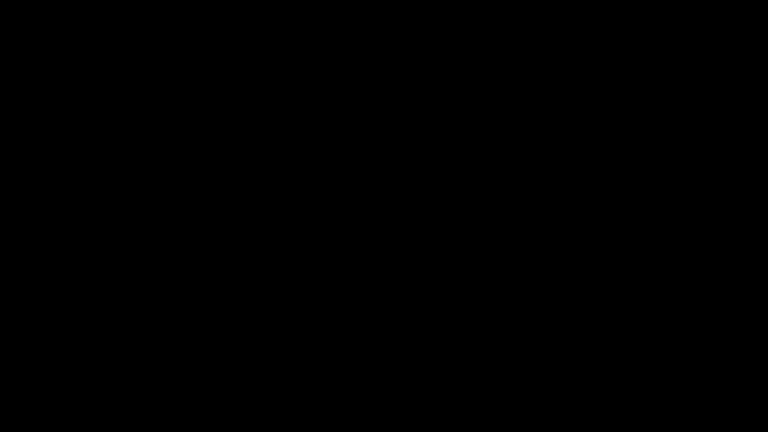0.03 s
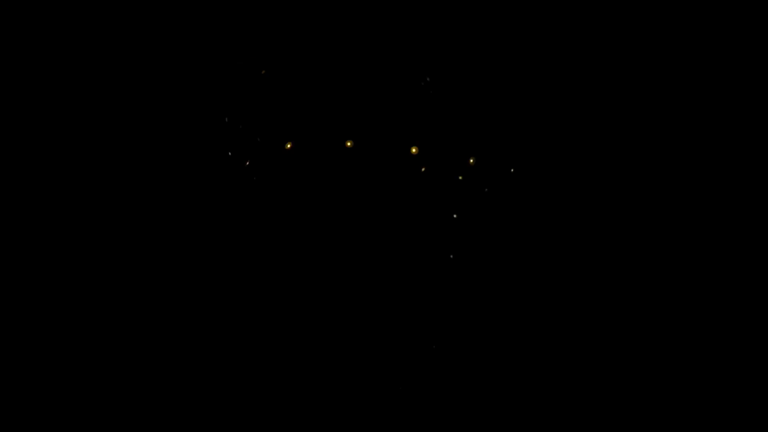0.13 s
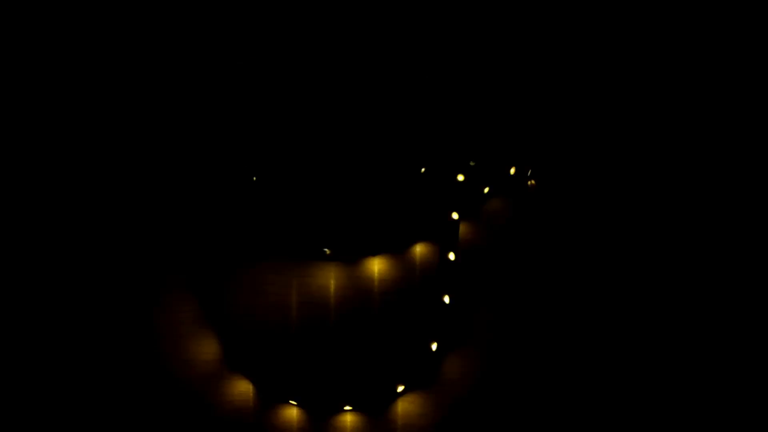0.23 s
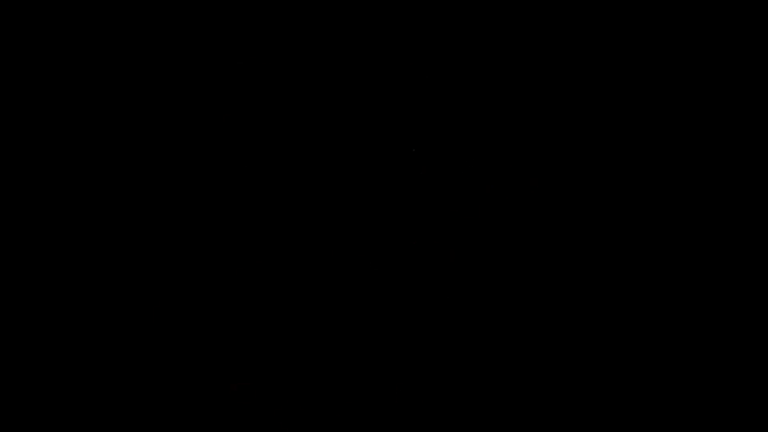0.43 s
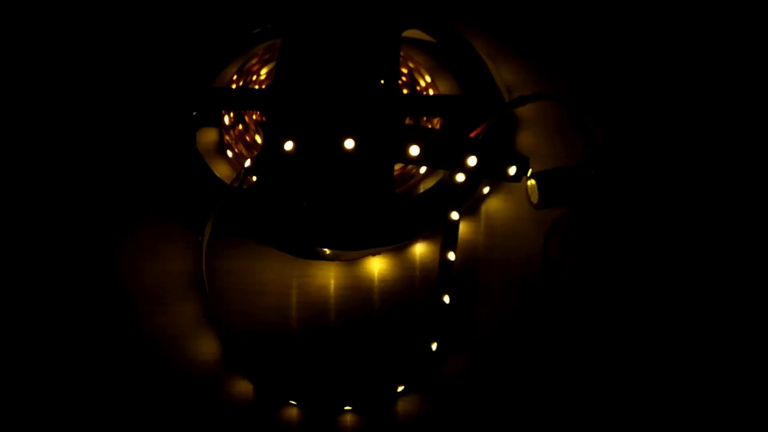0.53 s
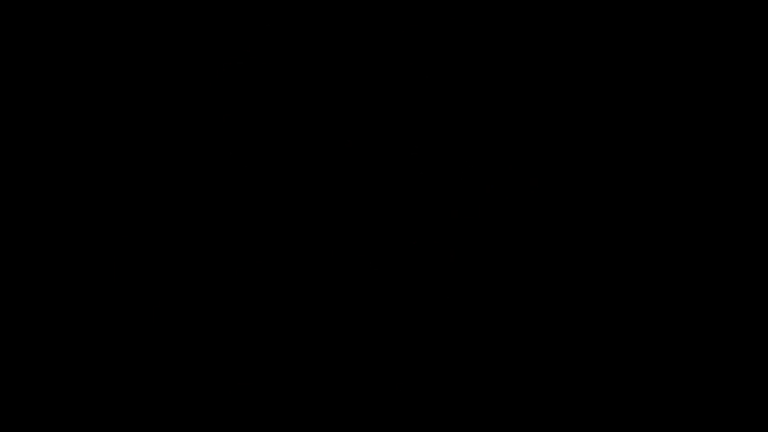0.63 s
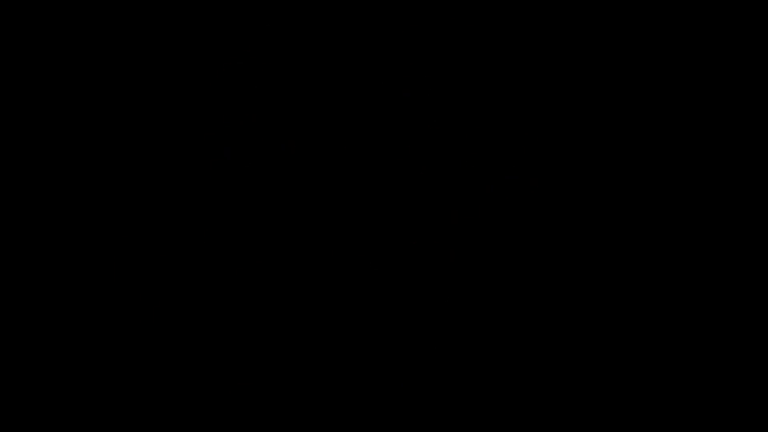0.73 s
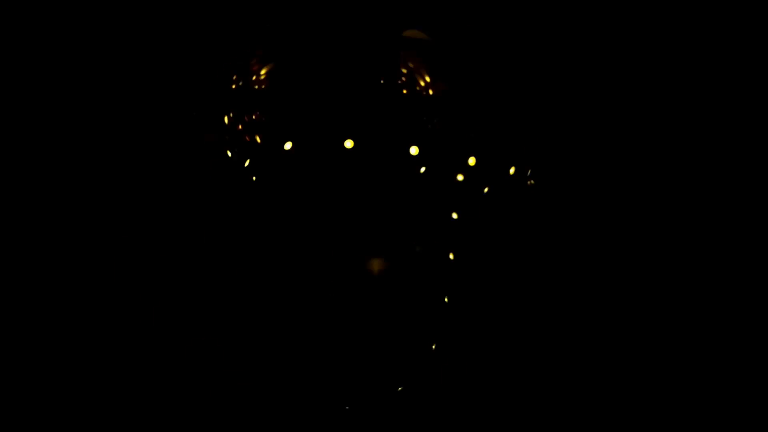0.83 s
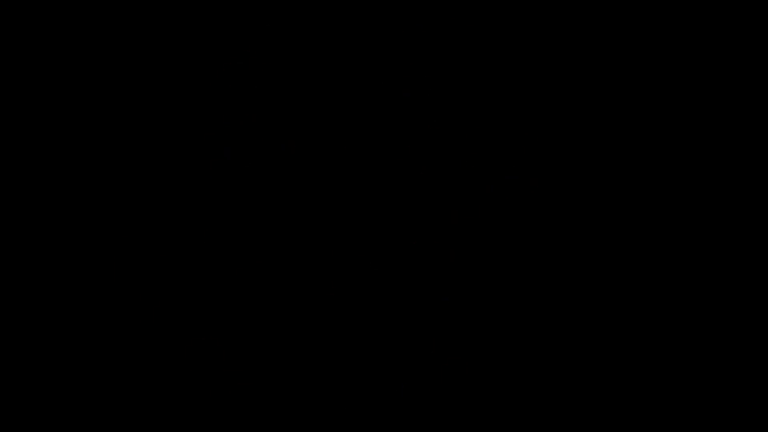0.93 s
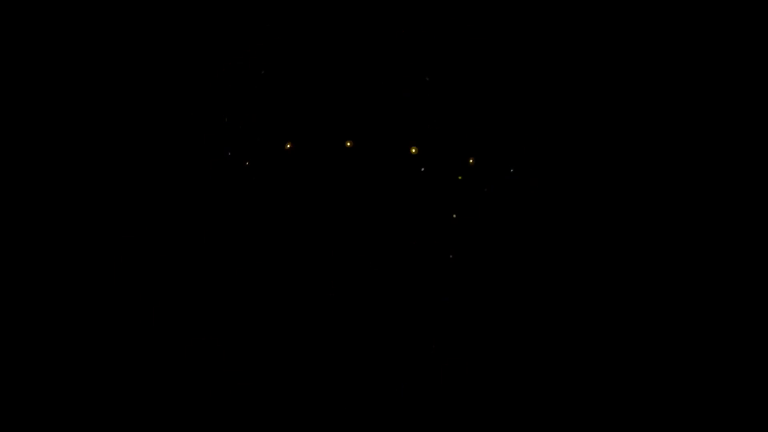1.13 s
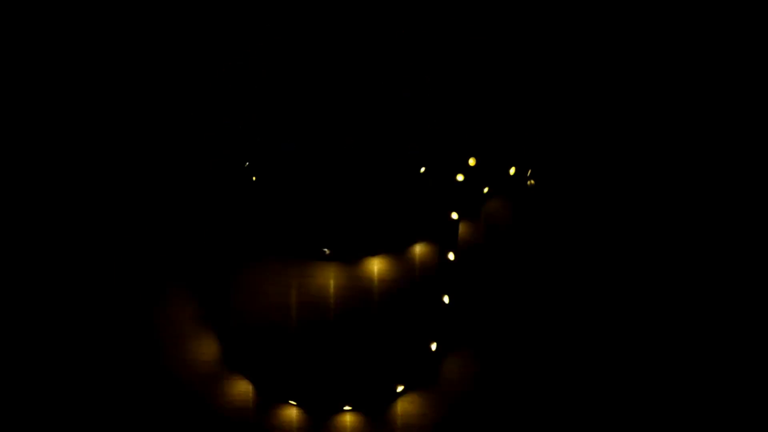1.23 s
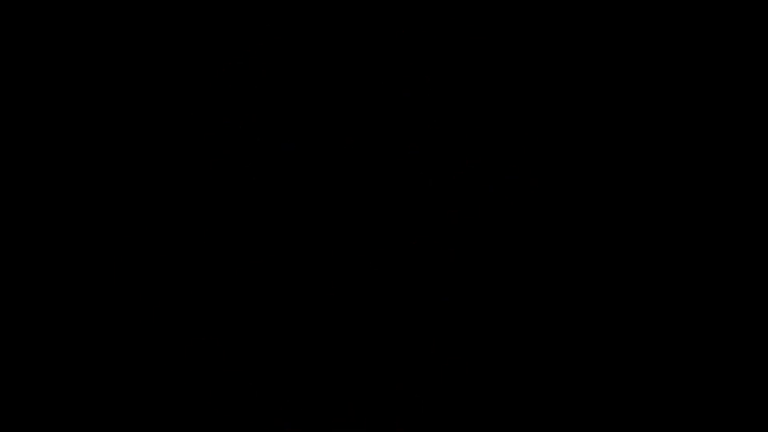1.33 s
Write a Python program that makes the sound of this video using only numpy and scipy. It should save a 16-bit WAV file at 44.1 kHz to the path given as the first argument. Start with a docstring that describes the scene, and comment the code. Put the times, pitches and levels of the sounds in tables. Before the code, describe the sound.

A small relay switches in crisp, bright clicks with a tiny case rattle, about every 0.14 seconds from 0.15 to 1.3, slightly left in close, wide stereo. After brief opening silence, soft room rumble, low hum and hiss fade in. At 0.31 a hard hollow object brushes, cracks and thuds nearby, ringing shortly. A faint tick follows at 0.51, a faint hollow tap at 0.86.

```python
"""A quiet room: a small relay switches seven times a second, a little to the left of the stereo microphone.
Each snap of the armature rings the contacts, rattles the case and nudges its mount; the room answers.
Once, nearby, a hard hollow object brushes, cracks and thuds down, and its body rings in beating modes.
A faint tick and a hollow tap follow. Snaps and rings are impulses and damped sines; rattle, cracks and
room tails are fading coloured noise. Behind lie a wavering low hum, room rumble and hiss."""
import sys
import numpy as np
from scipy import signal
from scipy.fft import rfft, irfft, next_fast_len
from scipy.io import wavfile

SR = 44100
rng = np.random.default_rng(int(sys.argv[2]) if len(sys.argv) > 2 else 0)


def generate_wav(sig):
    """Save sig (samples, or channels by samples) to the path in sys.argv[1] as 16-bit PCM at SR."""
    pcm = np.round(np.clip(np.atleast_2d(sig).T, -1, 1) * 32767).astype(np.int16)
    wavfile.write(sys.argv[1], SR, pcm)


N = 61739
T = np.arange(N) / SR
START_S = 0.078  # the sound opens here
NEAR_CENTRE_LAG_S = .00008  # right side after left, for the knock and the tap


def from_db(db):
    """Decibels to amplitude gain."""
    return 10 ** (np.asarray(db) / 20)


def at_hz(points, size):
    """Read a spectrum table on the grid of a transform, along log frequency."""
    hz, value = np.transpose(points)
    grid_hz = np.arange(size // 2 + 1) * SR / size
    return np.interp(np.log(grid_hz + 1), np.log(hz), value)


def colour(x, points):
    """Minimum-phase filter with the given spectrum, scaled to keep the power of white noise."""
    size = 2 * next_fast_len(N)
    gain = from_db(at_hz(points, size))
    cepstrum = irfft(np.log(gain / np.sqrt(np.mean(gain ** 2))))
    # folding the cepstrum makes the filter causal
    cepstrum[1:size // 2] *= 2
    cepstrum[size // 2 + 1:] = 0
    response = np.exp(rfft(cepstrum))
    return irfft(rfft(x, size) * response)[..., :N]


# likeness of left and right in diffuse sound: (f/Hz, correlation 0-1)
DIFFUSE_LIKENESS = [(30, 0), (100, 0), (350, 0.2), (700, 0.81), (1300, 0.21), (2000, 0.05)]


def diffuse():
    """White stereo noise arriving from all round: the two sides are most alike near 700 Hz."""
    size = 2 * next_fast_len(N // 2 + 1)
    alike = np.clip(at_hz(DIFFUSE_LIKENESS, size), -1, 1)
    mid, side = rfft(rng.standard_normal((2, size)))
    mid = np.sqrt((1 + alike) / 2) * mid
    side = np.sqrt((1 - alike) / 2) * side
    return irfft(mid + side * [[1], [-1]])[:, :N]


def blows(times, dbs):
    """One impulse for each blow."""
    out = np.zeros(N)
    samples = np.clip((np.asarray(times) * SR).astype(int), 0, N - 1)
    np.add.at(out, samples, from_db(dbs))
    return out


def dying(hits, t60, hold=0):
    """Envelope that holds, then dies away after every impulse; overlapping powers add."""
    power = from_db(-60 * np.maximum(T - hold, 0) / t60) ** 2
    total = signal.fftconvolve(hits ** 2, power)[:N]
    return np.sqrt(np.maximum(total, 0))


def ring(hits, modes, sign=1, rise=1e-6):
    """Impulses excite damped sines; mode k is scaled by sign**k, and a soft blow takes time to rise."""
    body = np.zeros(N)
    for k, (hz, db, t60) in enumerate(modes):
        decay = from_db(db - 60 * T / t60)
        body += sign ** k * decay * np.sin(2 * np.pi * hz * T)
    return signal.fftconvolve(hits, body * (1 - np.exp(-T / rise)))[:N]


def later(x, s):
    """Delay by whole samples."""
    return np.interp(np.arange(N) - np.round(s * SR), np.arange(N), x, left=0)


def place(x, lag, pan_db=0):
    """A source left of the microphone: left comes first, raised by pan_db; right is lowered by it."""
    return np.array([x * from_db(pan_db), later(x, lag) * from_db(-pan_db)])


# armature snaps: (t/s, relative snap level/dB, relative nudge level of the mount/dB)
ARMATURE_SNAPS = [(0.013, -11, -1.5), (0.1537, -2.5, -0.5), (0.2958, -4.5, -2), (.4382, -4, 1.5),
                  (0.5801, -3.5, 0), (0.725, -3.5, -1.5), (0.8673, -2, -0.5), (1.0089, -3, -0.5),
                  (1.1510, -3, 1), (1.2955, -4, 0.5)]
# ring of the contacts: (f/Hz, relative level/dB, t60/s)
CONTACT_RING = [(6230, -45.5, 0.054), (8430, -38.5, 0.0045), (10160, -34, 0.011), (13000, -37.5, 0.0087)]
# colour of the snap: (f/Hz, relative level/dB)
SNAP_COLOUR = [(1500, -15), (3500, -21), (5000, 0), (6300, -14), (8300, 9), (10100, 0.5), (11000, -6),
               (14500, -7.5)]
# colour of the rattling case: (f/Hz, relative level/dB)
CASE_COLOUR = [(1200, -11), (2300, 6), (3800, -11.5), (5500, 1.5), (7500, 10.5), (11000, 1.5), (14000, -11)]
# ring of the mount: (f/Hz, relative level/dB, t60/s)
MOUNT_RING = [(457, -40.5, 0.027), (720, -49, 0.036), (897, -51.5, 0.03), (1187, -52, 0.036),
              (1850, -70, 0.054)]
# colour of the room's answer to a click: (f/Hz, relative level/dB)
CLICK_ROOM_COLOUR = [(400, 6), (900, 9.5), (1400, -2.5), (4800, -8.5), (6300, 0), (7200, 2.5), (8400, 7),
                     (9100, -2), (10000, 5.5), (10800, -1), (13300, 2), (15000, -19)]
SNAP_DB, BOUNCE_S, BOUNCE_DB = -18, .0005, -2  # the bounce time varies by up to 30 %
RATTLE_DB, RATTLE_HOLD_S, RATTLE_T60_S = -42.5, .007, .012
MOUNT_DELAY_S, REBOUND_S, REBOUND_DB = 0.00094, 0.004318, -1.5
CLICK_TAIL_DB, CLICK_TAIL_T60_S, CLICK_TAIL_DELAY_S = -45, 0.35, .009
RELAY_LAG_S, RELAY_PAN_DB = .00032, 3.2
MOUNT_LAG_S, MOUNT_PAN_DB = .00008, 2


def relay():
    """A snap bounces once and rings the contacts, rattles the case, nudges the mount twice, then the room."""
    s, snap_db, nudge_db = np.transpose(ARMATURE_SNAPS)
    hits = blows(s, snap_db)
    bounces = blows(s + BOUNCE_S * rng.uniform(.7, 1.3, len(s)), snap_db + BOUNCE_DB)
    snap = from_db(SNAP_DB) * colour(hits + bounces, SNAP_COLOUR)
    contacts = ring(hits, CONTACT_RING)

    rattle_noise = dying(hits, RATTLE_T60_S, RATTLE_HOLD_S) * diffuse()
    rattle = from_db(RATTLE_DB) * colour(rattle_noise, CASE_COLOUR)

    nudges = blows(s + MOUNT_DELAY_S, nudge_db)
    rebounds = from_db(REBOUND_DB) * later(nudges, REBOUND_S)
    mount = ring(nudges + rebounds, MOUNT_RING)

    tail_noise = dying(later(hits, CLICK_TAIL_DELAY_S), CLICK_TAIL_T60_S) * diffuse()
    room = from_db(CLICK_TAIL_DB) * colour(tail_noise, CLICK_ROOM_COLOUR)

    direct = place(snap + contacts, RELAY_LAG_S, RELAY_PAN_DB)
    return direct + rattle + place(mount, MOUNT_LAG_S, MOUNT_PAN_DB) + room


# the hollow object lands and chatters: (t/s, relative level/dB)
LANDINGS = [(.3112, -5), (.3133, 1), (.3153, 0), (.3173, -2), (.3202, -5)]
# colour of the brush against the surface: (f/Hz, relative level/dB)
BRUSH_COLOUR = [(100, -19), (500, 5), (1200, -13), (2200, 18), (6200, -1), (14000, -26)]
# colour of the cracks: (f/Hz, relative level/dB)
CRACK_COLOUR = [(50, -30), (130, -15), (210, -4), (320, -2), (590, 6), (750, -3), (1100, 1), (1500, -2),
                (2400, -3), (3500, -6), (4700, -10), (6100, -11), (7400, -22), (9000, -20), (14000, -23)]
# thud of the surface: (f/Hz, level/dB before each mode gains 1.32 times more than the last, t60/s)
SURFACE_THUD = [(194, -39.5, .08), (344, -38.5, 0.05), (590, -27.5, 0.04), (1080, -27, 0.024),
                (1436, -34, 0.011), (2187, -37, 0.028)]
# ring of the hollow body: (f/Hz, relative level/dB, t60/s)
HOLLOW_RING = [(190, -48, .25), (350, -46, .25), (533, -41, .3), (591, -34.5, .25), (842, -37, .25),
               (925, -27, .22), (965, -39, .4), (1008, -39, .4), (1052, -36.5, .38), (1082, -33.5, .54),
               (1130, -42, .36), (1201, -43.5, .36), (1357, -46, .25), (1411, -47, .33), (1642, -48, .22),
               (2156, -48, .15)]
# colour of the room's answer to the knock: (f/Hz, relative level/dB)
KNOCK_ROOM_COLOUR = [(50, -10), (120, -5.5), (200, -1), (600, 0), (720, -6), (1000, 6.5), (1500, -6),
                     (2400, -5), (3400, -9), (4700, -8.5), (6100, -16.5), (7400, -16.5), (9000, -19.5),
                     (14000, -22)]
BRUSH_S, BRUSH_DB = 0.0083, -41.5  # it brushes the surface for this long just before landing
CRACK_DB, CRACK_T60_S = -23.5, .014
SETTLE_S, KNOCK_RISE_S, KNOCK_RING_DB = .3236, .0006, -1.8  # it drops flat and its hollow body rings
KNOCK_TAIL_DB, KNOCK_TAIL_T60_S, KNOCK_TAIL_DELAY_S = -34, 0.61, 0.0043


def knock():
    """A brush, a quick chatter of cracks and a thud; then the hollow body rings, its close modes beating."""
    s, crack_db = np.transpose(LANDINGS)
    brush_noise = dying(blows(s[:1] - BRUSH_S, 0), CRACK_T60_S, BRUSH_S) * diffuse()
    brush = from_db(BRUSH_DB) * colour(brush_noise, BRUSH_COLOUR)

    crack_noise = dying(blows(s, crack_db), CRACK_T60_S) * diffuse()
    crack = from_db(CRACK_DB) * colour(crack_noise, CRACK_COLOUR)

    # the second landing thuds; its modes alternate in sign
    thud = ring(blows(s[1:2], 0), SURFACE_THUD, sign=-1.32)
    body = ring(blows([SETTLE_S], KNOCK_RING_DB), HOLLOW_RING, rise=KNOCK_RISE_S)

    landing = blows(s[:1], 0)
    tail_noise = dying(later(landing, KNOCK_TAIL_DELAY_S), KNOCK_TAIL_T60_S) * diffuse()
    room = from_db(KNOCK_TAIL_DB) * colour(tail_noise, KNOCK_ROOM_COLOUR)
    return place(thud + body, NEAR_CENTRE_LAG_S) + crack + brush + room


# ring of the faint hollow tap: (f/Hz, relative level/dB, t60/s)
TAP_RING = [(683, -47, 0.18)]
TAP_S = .86  # just before one of the clicks


def tap():
    """One faint, hollow tap: an impulse rings a single damped mode."""
    return place(ring(blows([TAP_S], 0), TAP_RING), NEAR_CENTRE_LAG_S)


# colour of the faint tick: (f/Hz, relative level/dB)
TICK_COLOUR = [(1000, -31), (3500, -4), (5700, 3), (8000, -6), (14000, -11)]
TICK_S, TICK_DB, TICK_T60_S = .513, -51, 0.13


def tick():
    """One faint tick after the knock: bright diffuse noise that dies away."""
    noise = dying(blows([TICK_S], 0), TICK_T60_S) * diffuse()
    return from_db(TICK_DB) * colour(noise, TICK_COLOUR)


# colour of the steady room noise: (f/Hz, relative level/dB)
ROOM_NOISE = [(25, -22), (40, -13), (65, -1.5), (85, -3.5), (120, 2.5), (170, 0.5), (260, -7), (420, -3.5),
              (600, -12.5), (1000, -12), (1350, -17), (1800, -15.5), (4500, -22), (10000, -22.5),
              (14000, -29)]
# colour of the early rumble: (f/Hz, relative level/dB)
EARLY_RUMBLE = [(30, -39), (70, -7), (200, -3.5), (480, 2.5), (700, -11.5), (2000, -24)]
# hum partials: (f/Hz, relative level/dB)
HUM_PARTIALS = [(117, -57.5), (142, -69), (209, -64.5)]
FLOOR_DB, RUMBLE_DB, RUMBLE_T60_S = -51.5, -47, 0.95
HUM_WAVER = .25  # share of the steady amplitude


def background():
    """Coloured noise for rumble and hiss, the rumble stronger at first, under a wavering hum."""
    out = from_db(FLOOR_DB) * colour(diffuse(), ROOM_NOISE)
    rumble_noise = dying(blows([START_S], 0), RUMBLE_T60_S) * diffuse()
    out = out + from_db(RUMBLE_DB) * colour(rumble_noise, EARLY_RUMBLE)
    for hz, db in HUM_PARTIALS:
        # slow random drift of strength and phase
        waver = signal.resample(rng.standard_normal((2, 24)), N, axis=1)
        drift = 1 + HUM_WAVER * (waver[0] + 1j * waver[1])
        tone = np.real(drift * np.exp(2j * np.pi * hz * T))
        out = out + from_db(db) * np.sqrt(2) * tone
    return out


def scene():
    """Relay, knock, tap, tick and room together."""
    return relay() + knock() + tap() + tick() + background()


# each side is fed, late and inverted, to the other: (f/Hz, share 0-1)
WIDENING = [(500, 0), (1200, .45), (2200, .97), (4800, .96), (7000, .45), (14000, .25)]
# right microphone port against the left: (f/Hz, level/dB)
RIGHT_PORT_COLOUR = [(1000, 0.1), (4500, 2.55), (8000, 2.5), (10000, 4.5), (13000, 7)]
CROSSFEED_S = .000422
LOW_CUT_HZ, TOP_HZ, CUTOFF_HZ = 55, 14270, 15455


def record(dry):
    """The recorder widens the image, hollowing the middle; right is brighter, and the extremes are cut."""
    size = 2 * next_fast_len(N)
    ports, share = rfft(dry, size), at_hz(WIDENING, size)
    late = np.exp(-2j * np.pi * np.arange(size // 2 + 1) * SR / size * CROSSFEED_S)
    left, right = (ports - share * late * ports[::-1]) / np.sqrt(1 + share ** 2)
    right = right * from_db(at_hz(RIGHT_PORT_COLOUR, size))
    x = irfft(np.array([left, right]))[:, :N]
    x = signal.sosfilt(signal.butter(2, LOW_CUT_HZ, "high", fs=SR, output="sos"), x)
    # silence first, then a 6.9 ms fade in
    x = x * np.clip((T - START_S) / 0.0069, 0, 1)
    x = signal.sosfilt(signal.ellip(8, .3, 35, TOP_HZ, fs=SR, output="sos"), x)
    return signal.sosfilt(signal.cheby2(12, 50, CUTOFF_HZ, fs=SR, output="sos"), x)


dry = scene()
out = record(dry)
generate_wav(out)
```